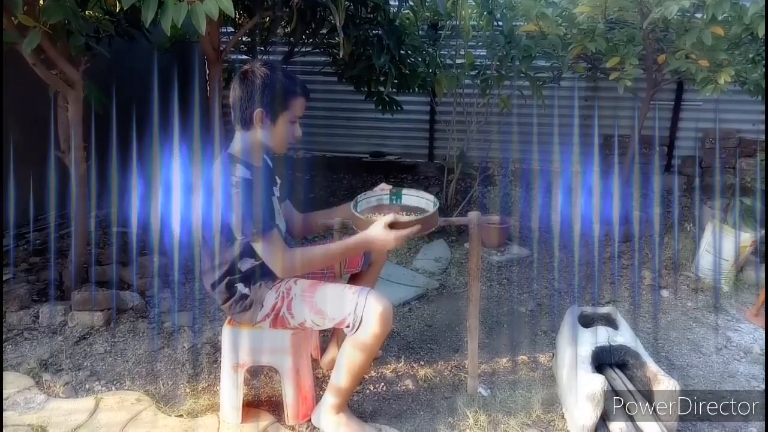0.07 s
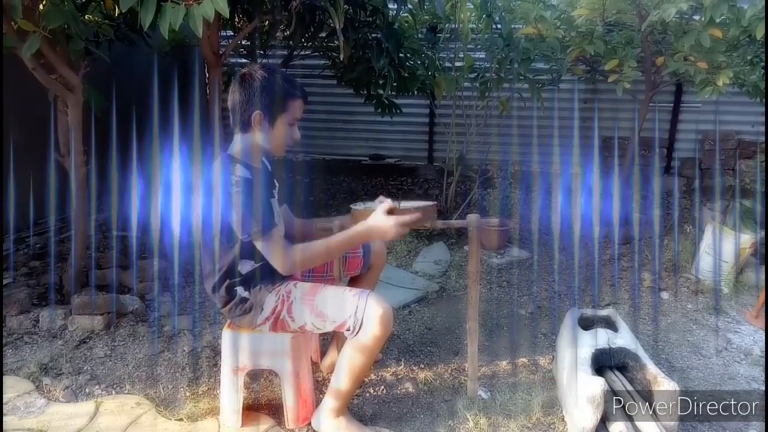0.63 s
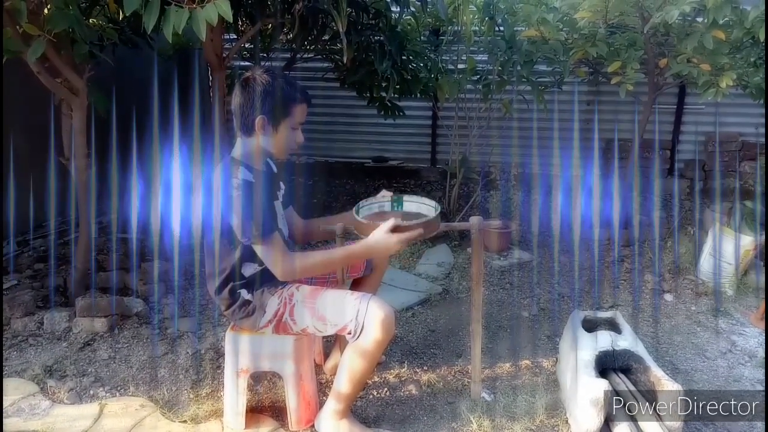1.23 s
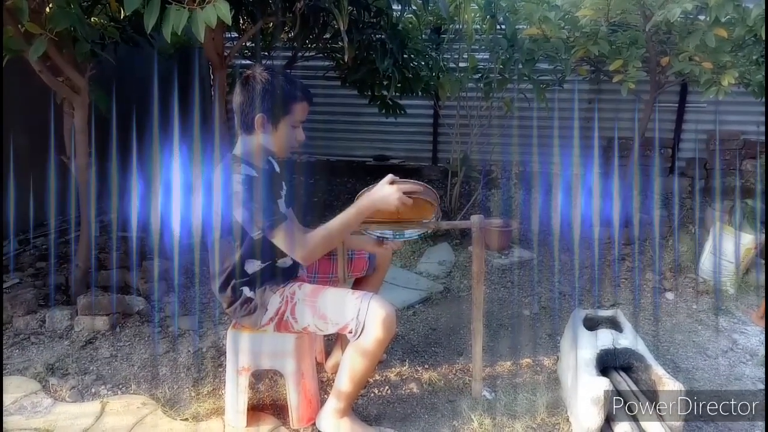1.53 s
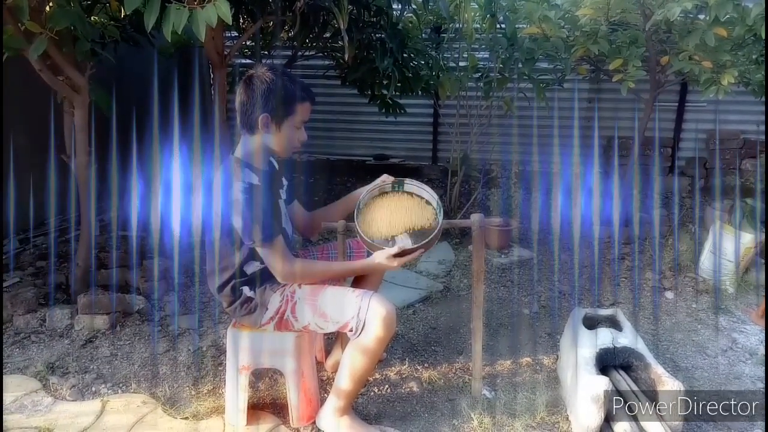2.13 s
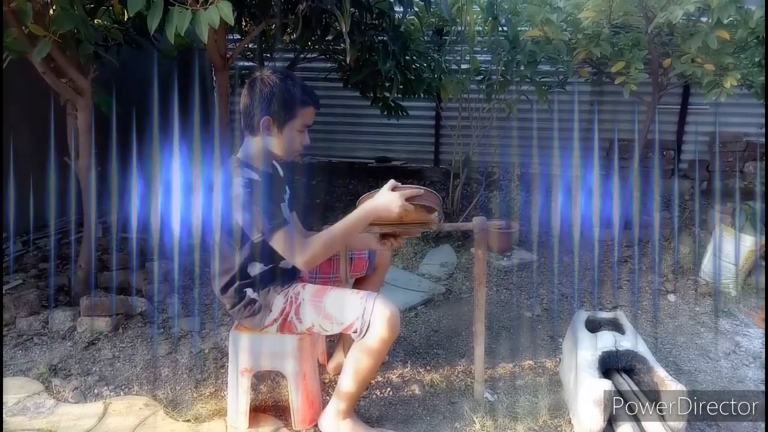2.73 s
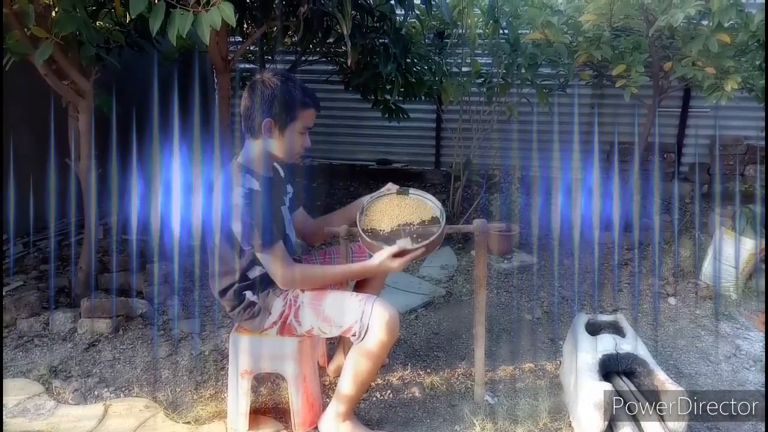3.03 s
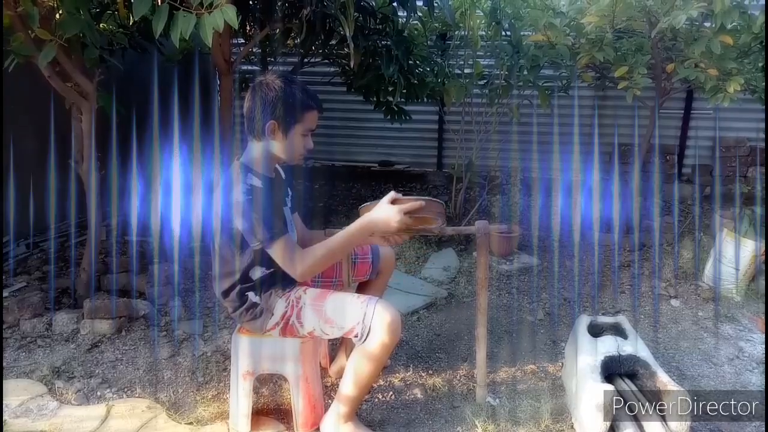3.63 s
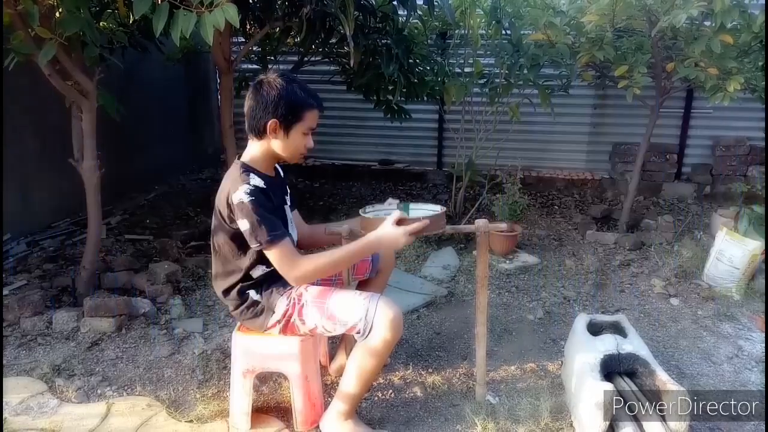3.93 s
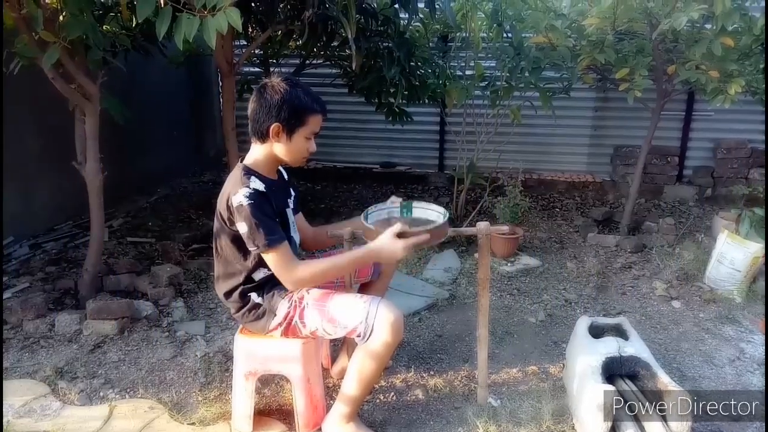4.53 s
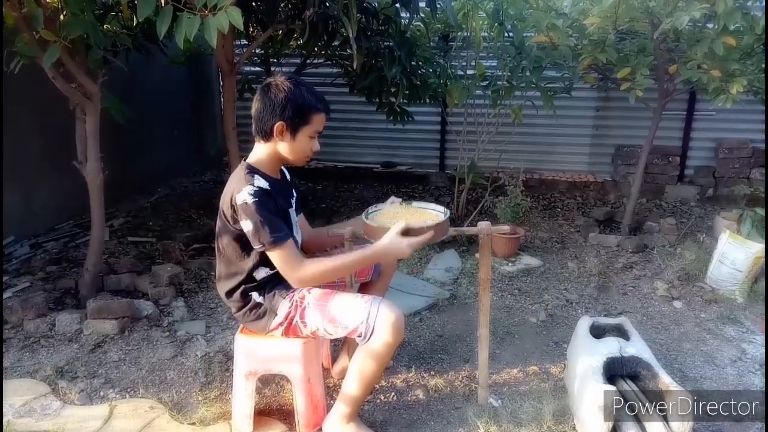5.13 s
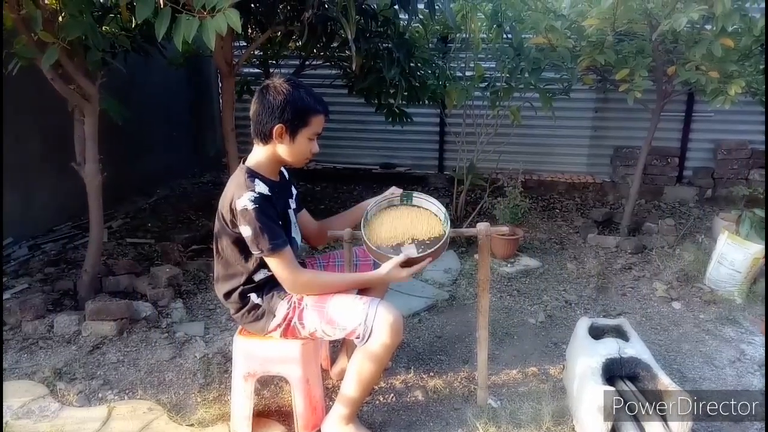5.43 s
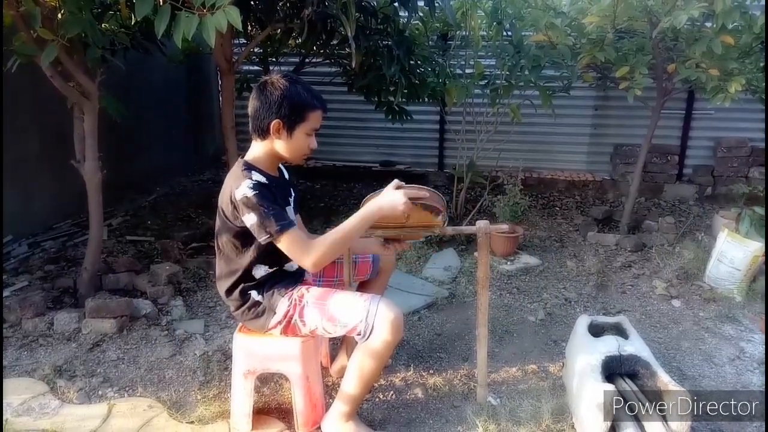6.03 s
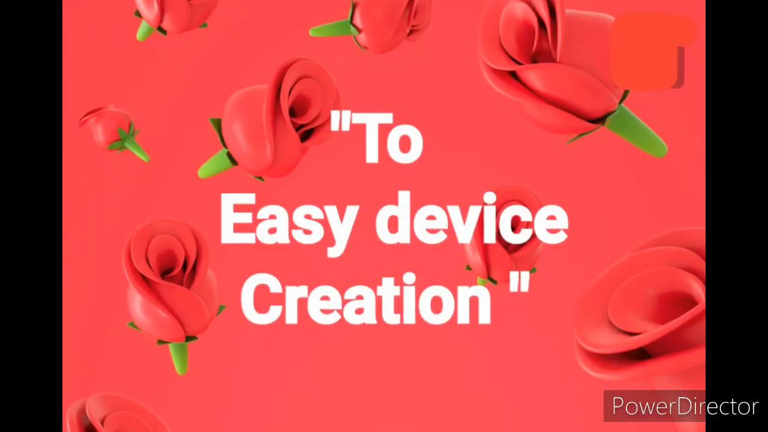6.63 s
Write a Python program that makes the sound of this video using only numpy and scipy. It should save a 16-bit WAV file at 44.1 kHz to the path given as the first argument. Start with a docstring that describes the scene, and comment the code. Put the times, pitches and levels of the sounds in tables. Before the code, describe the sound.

From the start, grain slides to and fro across a round metal sieve rocked by hand outdoors. Each slide is a bright, hissing swish of many tiny impacts, coming a little more than half a second apart, twelve in all, somewhat stronger on the left. From about 1.3 seconds, knocks near some of the turns make the rim ring with a light, high metallic tone and briefly rattle the kernels; the clearest come around 2.6, 3.2, 4.3 and 4.9 seconds. From about 1.9 seconds, wind buffets the microphone with a low rumble and short thumps, mostly on the left. The gusts are strongest near 2.6, 3.6 and 4.5 seconds and weaken after 5 seconds. Faint distant outdoor noise runs underneath throughout. The swishing keeps its rhythm until all sound stops abruptly just before 6.4 seconds.

```python
"""A round metal sieve is rocked by hand outdoors, over faint distant noise. From the start, grain slides
to and fro across it, each slide a swish: the superposition of thousands of tiny impacts.
From 1.3 s, knocks near some of the turns set the rim ringing in its normal modes and rattle the kernels.
From 1.9 s, wind buffets the two microphone ports with turbulent pressure.
Just before 6.4 s all sound stops abruptly."""
import sys
import numpy as np
from scipy import signal
from scipy.fft import irfft, next_fast_len
from scipy.io import wavfile
from scipy.ndimage import uniform_filter1d

SR = 44100
rng = np.random.default_rng(int(sys.argv[2]) if len(sys.argv) > 2 else 0)


def wav_out(sig):
    """Save sig, one row per channel (or a flat mono array), as 16-bit PCM at SR to the path in sys.argv[1]."""
    wavfile.write(sys.argv[1], SR, np.round(np.clip(np.atleast_2d(sig).T, -1, 1) * 32767).astype(np.int16))


N = 298997
TIME = np.arange(N) / SR

# slides, alternately out and back: t/s of peak flow, level/dB, duration factor, treble gain/dB at the wall
SLIDE_EVENTS = [(0.086, -25, 1.04, -0.5), (0.644, -25.5, 1.038, -0.5), (1.23, -25.5, 1.057, 1),
                (1.783, -25.5, 1.06, 4), (2.363, -25.5, 0.94, 1.5), (2.896, -26.5, 0.97, 0.5),
                (3.457, -25.5, 1.013, 2.5), (3.992, -29, 0.87, -2.5), (4.498, -27.5, 1.022, 1),
                (5.077, -25.5, 1.05, 3.5), (5.676, -27.6, 1.007, 1), (6.203, -26.5, .89, 1)]


def flow(out_s=(0.17, 0.12), back_s=(0.15, 0.17), rest_db=-61):
    """Incoherent addition: the slides sum in power as skewed Gaussian pulses, giving the flow in dB."""
    power = np.full(N, amp(rest_db) ** 2)  # a few kernels keep rolling at the turns
    for k, (s, db, stretch, _) in enumerate(SLIDE_EVENTS):
        rise, fall = back_s if k % 2 else out_s  # the heap stops fast going out, trickles coming back
        from_peak = (TIME - s) / (stretch * np.where(TIME < s, rise, fall))
        power += amp(db - 10 * np.minimum(from_peak ** 2, 20)) ** 2
    return 10 * np.log10(power)


def impacts(flow_db, peak_per_s=19000, spread_db=2.5, rubbing=0.7):
    """Shot noise: kernels strike mesh and wall at random, less often as the flow slackens."""
    per_s = peak_per_s * amp(0.5 * (flow_db - flow_db.max()))
    strength = amp(spread_db * np.minimum(rng.exponential(1, N), 4.5))  # a few strike much harder
    struck = rng.random(N) < per_s / SR
    bearing = rng.uniform(0, 2 * np.pi, N)
    port_weights = np.array([np.cos(bearing), np.sin(bearing)])
    clicks = unit(strength * struck / np.sqrt(per_s) * port_weights)
    return unit(clicks + rubbing * rng.standard_normal((2, N)))  # friction between kernels adds a hush


# spectrum of the swish at each port, coloured by the ports' resonances: f/Hz, left level/dB, right level/dB
SWISH_SPECTRUM = [(300, -34.5, -41), (580, -33, -36.5), (910, -20.5, -28.0), (1520, -13, -21),
                  (1870, -9, -12.5), (2823, -12.5, -20.5), (3180, -3.5, -18), (4114, 1, -11),
                  (5120, -16, -17), (6580, -2.5, -13.5), (6935, -9, -10), (7730, -21, -16),
                  (9980, -23, -23), (11200, -34.5, -30), (12700, -27.5, -35), (15400, -19.5, -38)]
# likeness of the swish at the two ports: f/Hz, coherence (0-1)
SWISH_COHERENCE = [(200, 0.58), (1300, 0.8), (2500, 0.74), (4000, 0.49), (7000, 0.22), (15000, .15)]
# phase shift from each port's own resonances: f/Hz, lead of the left port/rad
PORT_PHASE = [(0, 0.5), (3960, -1.0), (5600, 0), (6890, -2.5), (11900, 0.3), (12700, -2.5), (15200, -9.5),
              (16400, -8.4)]


def grain_swish(level_db=5, dulling=0.24, patter=0.19, fizz_db=0.6, spray_s=0.035):
    """Source and filter: port resonances colour the impacts, which are brighter when grain runs fast."""
    flow_db = flow()
    hz, t, z = spectra(impacts(flow_db), size=512)
    colour = amp([at_hz(SWISH_SPECTRUM, hz), at_hz(SWISH_SPECTRUM, hz, column=2)])
    colour *= hz ** 2 / (hz ** 2 + 200 ** 2)
    colour /= np.sqrt(np.mean(colour[0] ** 2))
    z = correlate(z, at_hz(SWISH_COHERENCE, hz)[:, None]) * colour[..., None]
    z[0] *= np.exp(1j * at_hz(PORT_PHASE, hz))[:, None]
    slack_db = np.interp(t, TIME, np.percentile(flow_db, 80) - flow_db)
    treble = np.clip((hz - 4500) / 4500, 0, 1)[:, None]
    bass = 1 / (1 + (hz / 1500) ** 4)[:, None]
    spray_db = sum(db * np.exp(-((t - s) / spray_s) ** 2) for s, *_, db in SLIDE_EVENTS)
    tilt_db = treble * (fizz_db + spray_db - dulling * slack_db)
    tilt_db += patter * bass * slack_db  # slow kernels still patter in the low range
    avalanche_db = 0.48 * patches(z.shape[1:], size=(200, 4))  # the heap slides in clumps
    flicker_db = 1.23 * patches(z.shape[1:], size=(8, 8))
    z *= amp(tilt_db + avalanche_db + flicker_db)
    return amp(level_db + flow_db) * waves(z, size=512)


# modes of the rim: f/Hz, level/dB, base T60/s, left minus right/dB, weight of a knock's sharp part (0-1)
RIM_MODES = [(1826, -15.5, 4.8, 2, 0), (1848, -1.06, 1.87, 11, 0.01), (3097, -17.5, .3, 2, 1),
             (5002, 3.5, 0.82, 9, 1), (5030, -7.5, 1.47, 14.5, .5), (8400, -10.5, 0.21, -18.5, 0.97),
             (8947, -16.5, .27, -16, 0.97), (9986, -14.5, 0.22, -7, 0.98)]
# knocks on the rim: t/s, blunt level/dB, sharp level/dB, T60 factor set by the grip, rattle level/dB
RIM_KNOCKS = [(1.271, -49, -67, 1.8, -53.5), (1.525, -46, -46, 1, -54), (1.908, -45.5, -51.5, 0.95, -50),
              (2.62, -37.5, -41, 1, -43), (3.242, -35.5, -36.5, 0.9, -47), (3.801, -59.5, -65, 1.54, -51),
              (4.265, -65.5, -61.5, 0.62, -32), (4.319, -36.5, -35.5, .6, -48),
              (4.658, -70.5, -52.5, 1.5, -56), (4.905, -32, -47, 0.72, -48),
              (6.266, -40.5, -55, 1.05, -45.5)]


def rim_ring(contact_s=0.0023, stir_db=-55, stir_tilt_db=-14, smother=0.23):
    """Damped normal modes: knocks ring long and close pairs beat; grain drives a smothered ring."""
    t = TIME[:2 * SR]
    attack = 1 - np.exp(-t / contact_s)
    flow_db, out = flow(), np.zeros((2, N))
    for hz, db, t60, side_db, sharp in RIM_MODES:
        tone = amp(db) * np.sin(2 * np.pi * hz * TIME)
        envelope = np.zeros(N)
        for s, blunt_db, sharp_db, grip, _ in RIM_KNOCKS:
            strike_db = (1 - sharp) * blunt_db + sharp * sharp_db
            add(envelope, s, attack * amp(strike_db - 60 * t / (t60 * grip)))
        grain_force = amp(stir_db + sharp * stir_tilt_db + flow_db) * rng.standard_normal(N)
        impulse_response = tone[:len(t)] * amp(-60 * t / (t60 * smother))
        forced = signal.fftconvolve(grain_force, impulse_response)[:N]
        out += amp([[side_db / 2], [-side_db / 2]]) * (envelope * tone + forced)
    return out


def kernel_rattle(t60_s=0.09, band_hz=(2200, 7000), right_db=-3):
    """Impulsive excitation: each knock makes the kernels jump in a fast-decaying burst of noise."""
    t, bursts = TIME[:SR // 4], np.zeros((2, N))
    for s, *_, db in RIM_KNOCKS:
        add(bursts, s, amp(db - 60 * t / t60_s) * rng.standard_normal((2, len(t))))
    band = signal.butter(2, band_hz, "bandpass", fs=SR, output="sos")
    return signal.sosfilt(band, bursts) * amp([[0], [right_db]])


# strongest gusts, each on one port: t/s, level/dB, Gaussian width/s, port (0 left, 1 right)
WIND_GUSTS = [(1.951, -18.5, 0.014, 0), (2.027, -27.5, .03, 0), (2.253, -19, 0.024, 0),
              (2.574, -11, .0085, 0), (2.637, -16, 0.02, 0), (2.851, -22.5, 0.014, 1),
              (2.94, -26.5, 0.018, 1), (3.125, -31.5, .05, 1), (3.56, -16, 0.025, 0), (3.6, -37, 0.083, 1),
              (3.668, -27, 0.035, 0), (4.459, -17, 0.018, 0), (4.577, -25, 0.0095, 0),
              (4.663, -22, .014, 0), (4.819, -27.5, 0.031, 1), (5.054, -30, 0.026, 1),
              (5.251, -28.5, 0.0089, 0), (5.548, -32.5, 0.0086, 0), (5.89, -37, 0.025, 0),
              (5.986, -32, 0.0088, 0)]
# the breeze gets up, holds and dies down: t/s, level/dB
BREEZE_LEVEL = [(0, -60), (.5, -68), (1.88, -71), (1.94, -40.5), (2.45, -38.5), (4.0, -44.5), (4.8, -39.5),
                (5.45, -45.5), (5.7, -58.5), (6.0, -44), (6.36, -56.5)]


def wind(breeze_db=-1, right_db=-3, hard_db=-17, flurry_db=3):
    """Turbulence at the ports: a rumble with buffets; hard gusts make smaller eddies and reach higher."""
    push = np.zeros((2, N))
    for s, db, width, port in WIND_GUSTS:
        push[port] += amp(db) * np.exp(-0.5 * ((TIME - s) / width) ** 2)
    soft = eddies(low_hz=45.5, top_hz=116, steepness=12)
    hard = eddies(low_hz=49, top_hz=182.5, steepness=7.9)
    hardness = push / (push + amp(hard_db))
    buffet = np.sqrt(1 - hardness) * soft + np.sqrt(hardness) * hard
    local_power = uniform_filter1d(buffet ** 2, size=1300, axis=1)
    buffet /= np.sqrt(local_power + 0.081)  # evened out, so the gust sets the strength
    breeze = amp(breeze_db + at_times(BREEZE_LEVEL)) * eddies(low_hz=38.5, top_hz=115.5, steepness=8.9)
    flurries = unit(uniform_filter1d(rng.standard_normal((2, N)), size=3000, axis=1))
    return push * buffet + breeze * amp(flurry_db * flurries) * amp([[0], [right_db]])


def eddies(low_hz, top_hz, steepness):
    """Turbulent pressure is local: each port gets its own independent band of low noise."""
    hz = np.fft.rfftfreq(next_fast_len(N), 1 / SR)
    band = (hz ** 2 / (hz ** 2 + low_hz ** 2)) ** 2 / np.sqrt(1 + (hz / top_hz) ** steepness)
    real, imaginary = rng.standard_normal((2, 2, len(hz)))
    return unit(irfft((real + 1j * imaginary) * band)[:, :N])


# spectral density of the distant noise: f/Hz, relative level/dB
AMBIENT_SPECTRUM = [(40, -11.5), (100, 0), (160, 4), (260, -11), (370, -5.5), (520, 3.5), (700, -5.5),
                    (1000, 1.5), (1500, -6.5), (2500, -17), (5000, -23.5), (9000, -37.5), (15000, -52.5)]
# level of the background noise over time: t/s, level/dB
AMBIENT_LEVEL = [(0, -46), (.48, -56), (.8, -50), (1.45, -53), (1.7, -48.5), (2.85, -49.5), (3.2, -56),
                 (3.55, -49.5), (4.25, -59), (4.55, -49.5), (5.6, -50.5), (5.9, -56)]


def outdoors(level_db=-0.5, right_db=-6, coherence=0.33, drift_db=4):
    """A partly coherent field: distant noise whose spectrum drifts in patches."""
    hz, _, z = spectra(rng.standard_normal((2, N)), size=2048)
    colour_db = at_hz(AMBIENT_SPECTRUM, hz)[:, None] + drift_db * patches(z.shape[1:], size=(6, 16))
    noise = unit(waves(correlate(z, coherence) * amp(colour_db), size=2048))
    return amp(level_db + at_times(AMBIENT_LEVEL)) * noise * amp([[0], [right_db]])


def amp(db):
    """Level in dB to amplitude ratio."""
    return 10 ** (np.asarray(db) / 20)


def unit(x):
    """Normalisation to rms 1."""
    return x / np.sqrt(np.mean(x ** 2) + 1e-20)


def at_times(rows):
    """Linear interpolation of a time table at every sample."""
    return np.interp(TIME, *np.transpose(rows))


def at_hz(rows, hz, column=1):
    """Interpolation of a spectrum table in log frequency."""
    rows = np.asarray(rows)
    return np.interp(np.log(hz + 1), np.log(rows[:, 0] + 1), rows[:, column])


def spectra(x, size):
    """Short-time Fourier transform: f/Hz, t/s, values (port, bin, frame)."""
    return signal.stft(x, SR, nperseg=size, noverlap=size * 3 // 4)


def waves(z, size):
    """Inverse short-time Fourier transform."""
    return signal.istft(z, SR, nperseg=size, noverlap=size * 3 // 4)[1][..., :N]


def patches(shape, size):
    """Moving averages make a smooth random field of rms 1; size = (bins, frames) of a patch."""
    across_bins = uniform_filter1d(rng.standard_normal(shape), size[0], axis=0)
    return unit(uniform_filter1d(across_bins, size[1], axis=1))


def correlate(z, coherence):
    """Partial coherence: the right signal takes a share of the left, at constant power."""
    return np.array([z[0], coherence * z[0] + np.sqrt(1 - coherence ** 2) * z[1]])


def add(mix, s, sound):
    """Superposes a sound on the mix at time s."""
    part = mix[..., round(s * SR):][..., :sound.shape[-1]]
    part += sound[..., :part.shape[-1]]


def scene():
    """Linear superposition of sieve, wind and surroundings."""
    return grain_swish() + rim_ring() + kernel_rattle() + wind() + outdoors()


def record(dry, stop_s=6.372, fade_s=0.019, cutoff_hz=15600):
    """Gating and band limiting: the sound stops short and is low-pass filtered."""
    gate = np.clip((stop_s - TIME) / fade_s, 0, 1)
    lowpass = signal.firwin(701, cutoff_hz, window=("kaiser", 9), fs=SR)
    return signal.oaconvolve(dry * gate, lowpass[None], "same")


dry = scene()
out = record(dry)
wav_out(out)
```